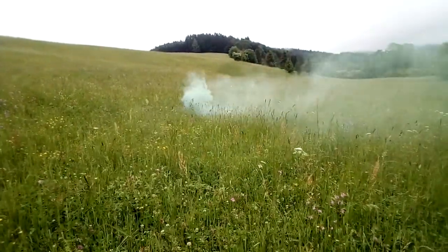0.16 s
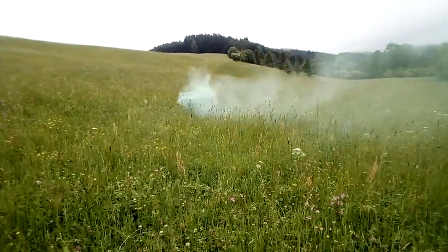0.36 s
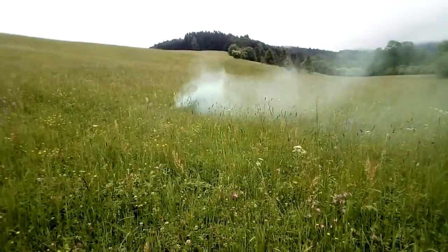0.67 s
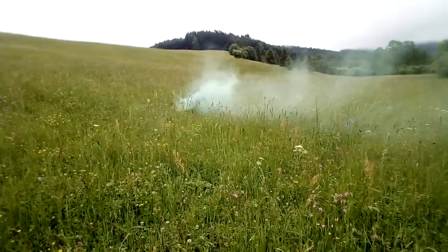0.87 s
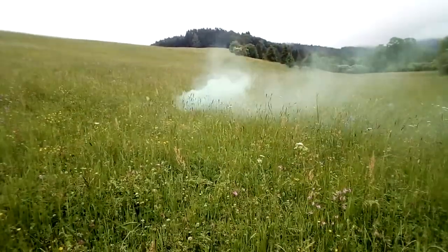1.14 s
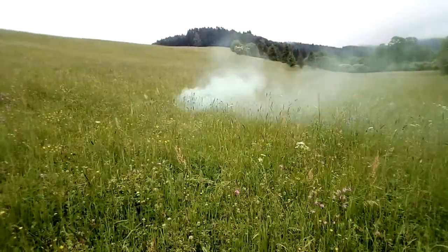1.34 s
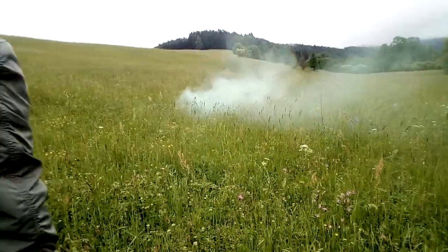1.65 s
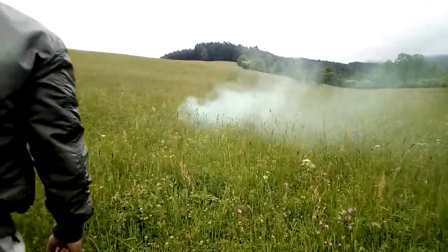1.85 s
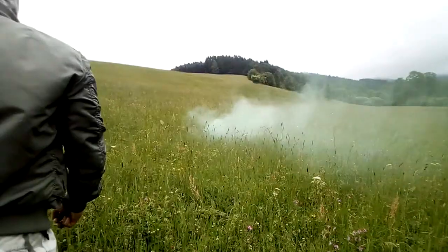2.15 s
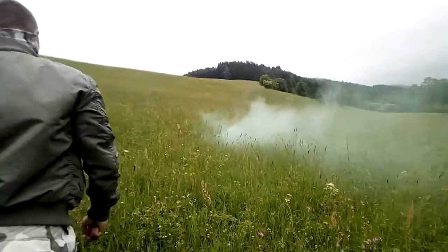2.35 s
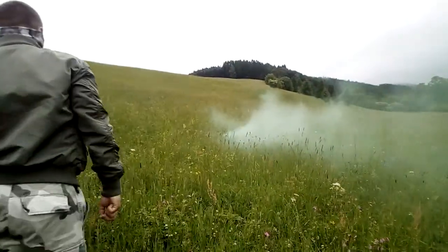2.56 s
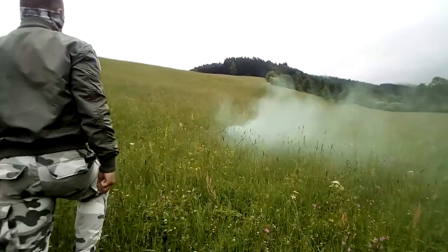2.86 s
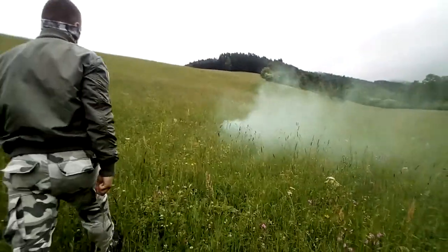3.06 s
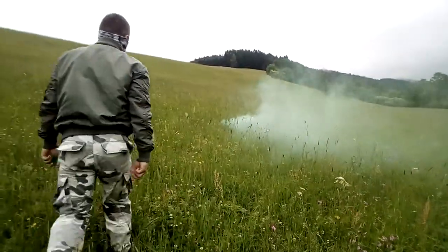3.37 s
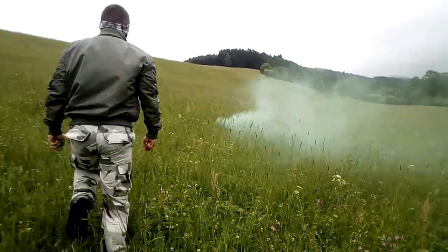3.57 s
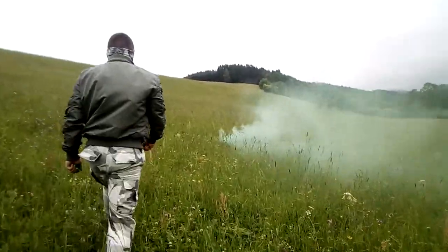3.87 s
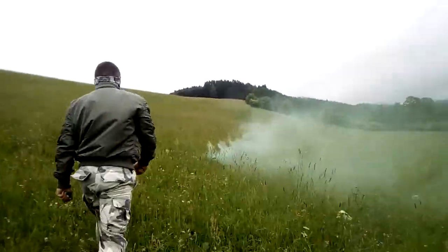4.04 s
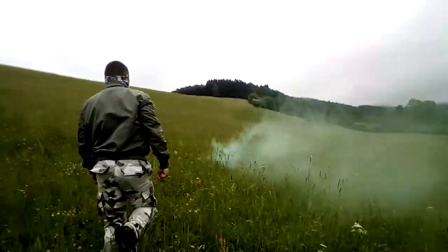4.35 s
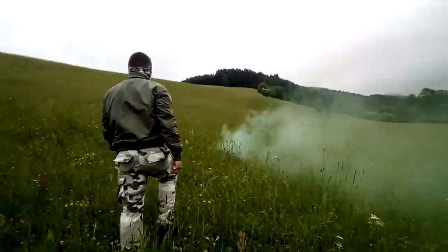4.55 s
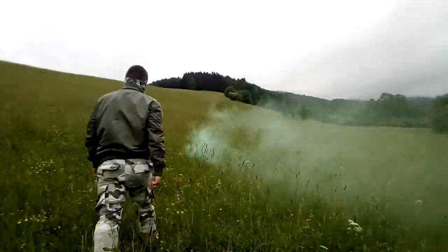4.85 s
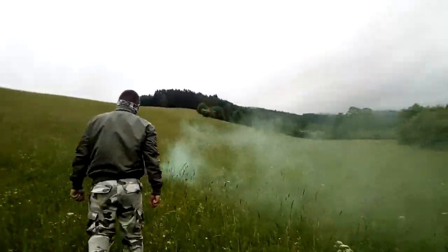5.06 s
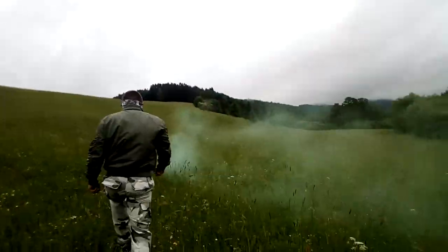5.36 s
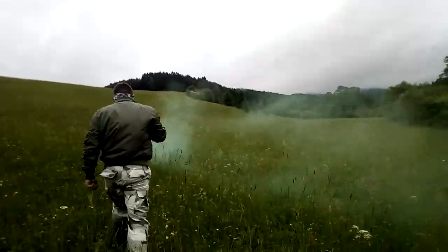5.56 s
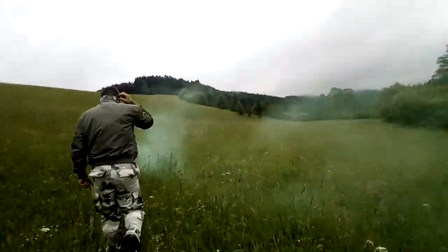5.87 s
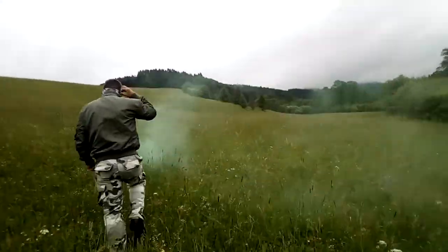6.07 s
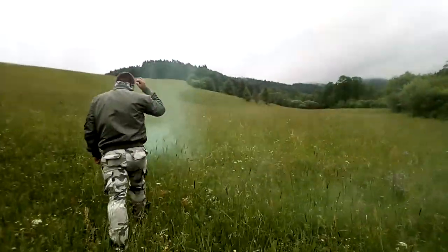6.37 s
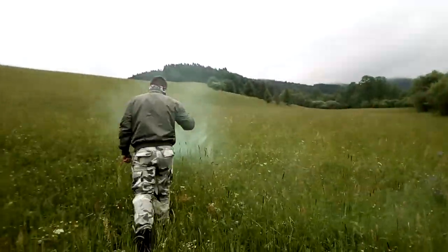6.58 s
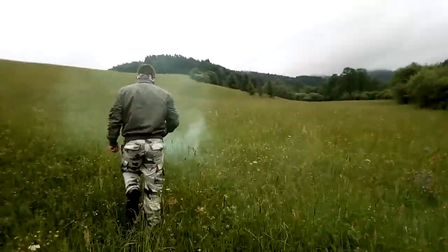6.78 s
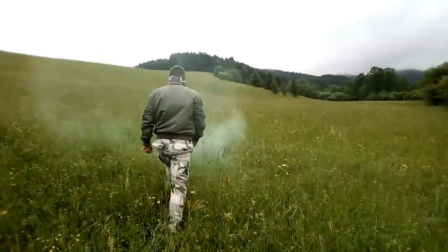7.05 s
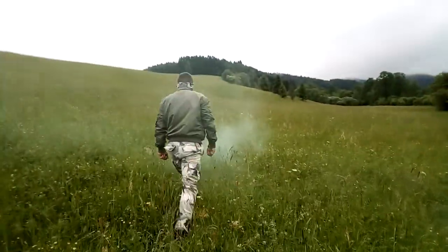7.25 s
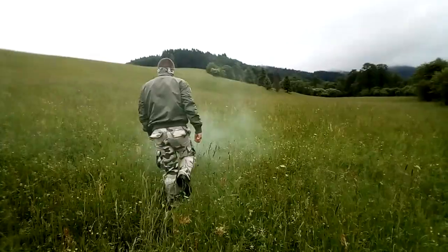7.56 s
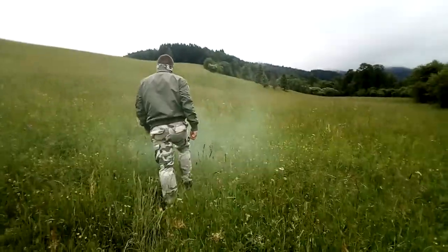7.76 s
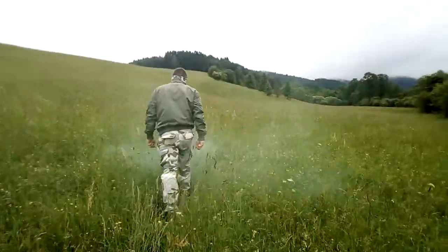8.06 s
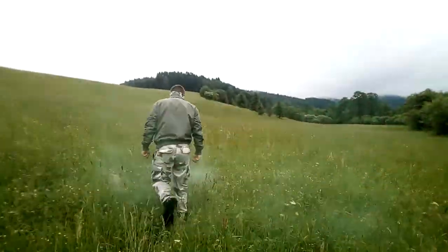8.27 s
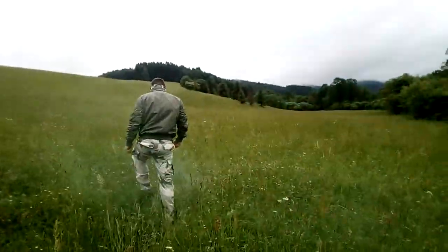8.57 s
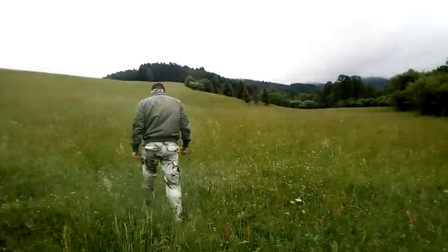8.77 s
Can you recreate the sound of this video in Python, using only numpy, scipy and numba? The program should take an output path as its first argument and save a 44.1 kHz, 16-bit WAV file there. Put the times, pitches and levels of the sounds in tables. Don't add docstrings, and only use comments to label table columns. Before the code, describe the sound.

An open summer meadow heard through a small, exposed microphone with light steady hiss. From 0 to 0.6 s blunt low wind thumps dominate, with faint lark notes far away. The wind drops; from about 0.8 s legs begin swishing through tall grass, bright and dry, with small stem cracks around 1 s. Gusts bump again at 2 to 2.7 s, then a lull leaves brushing strides at 3 to 3.5 s. From 4 to 5.6 s wind knocks return, with snaps near 4.1 s and a short rising squeak at 5.03 s. A rapid tiny creak runs at 5.7 to 5.8 s. Rustling grows denser at 6 to 7 s, with scrapes, squeaky rubs and the heaviest buffeting. After 7 s wind mostly eases while swishes continue, strong near 7.9 s; a final hard gust hits at 8.5 to 8.9 s. Distant falling whistles appear intermittently until about 7.7 s.

```python
import sys
import numpy as np
from scipy import signal
from scipy.fft import rfft, irfft
from scipy.io import wavfile
from scipy.ndimage import uniform_filter1d, map_coordinates
from numba import njit

SR = 44100
rng = np.random.default_rng(int(sys.argv[2]) if len(sys.argv) > 2 else 0)


def transcribe(u):
    v = np.clip(np.atleast_2d(u).T, -1, 1)
    q = np.round(v * 32767).astype(np.int16)
    wavfile.write(sys.argv[1], SR, q)


def boost_factor(decibels):
    exponent = np.asarray(decibels, float) / 20
    return 10 ** exponent


N = 393372
T = np.arange(N) / SR

# level/dB against the rustle, gain/dB per dB of brightness
GRASS_LAYERS = [
    (-1.5, -.5),
    (-1, 0),
    (-7, 0.3384),
    (-28, 0.9927),
]


def curves(table):
    s, *columns = np.transpose(table)
    return [np.interp(T, s, c) for c in columns]


def unit(x):
    return x / np.sqrt(np.mean(x ** 2))


@njit
def svf(x, hz, k):
    y, b, l = np.empty((3, len(x))), 0., 0.
    for i in range(len(x)):
        g = np.tan(np.pi * hz[i] / SR)
        v = (b + g * (x[i] - l)) / (1 + g * (g + k))
        y[0, i], y[1, i] = l + g * v, k * v
        y[2, i] = x[i] - y[1, i] - y[0, i]
        b, l = 2 * v - b, l + 2 * g * v
    return y


def steady(x, hz, k):
    return svf(x, np.full(len(x), float(hz)), k)


def noise():
    return rng.standard_normal(N)


def walk(rate):
    k = int(SR / rate)
    held = np.repeat(rng.standard_normal(N // k + 1), k)
    return unit(uniform_filter1d(uniform_filter1d(held, k), k)[:N])


def grains(rate, spread_db):
    hit = rng.random(N) < rate / SR
    size = boost_factor(spread_db * np.minimum(rng.exponential(size=N), 6))
    return unit(hit * rng.standard_normal(N) * size)


def colour(x, points, lo=0, hi=SR):
    hz, db = np.transpose(points)
    f = np.fft.rfftfreq(N, 1 / SR) + 1
    edges = 1 / np.sqrt((1 + (lo / f) ** 12) * (1 + (f / hi) ** 20))
    shape = boost_factor(np.interp(np.log(f), np.log(hz), db))
    return unit(irfft(rfft(x) * shape * edges, N))


def add(out, s, piece):
    i = max(int(s * SR), 0)
    out[i:i + len(piece)] += piece[:N - i]


def sweeps(offset_db, per_db):
    # t/s, rustle level/dB, brightness/dB
    brush = [(0, -77.5, -11.5), (.6, -72.5, -5), (.8, -65.5, 10.5), (2, -65, 7), (2.5, -65, -2.5),
             (2.9, -64.5, 7), (4.25, -64, -0.5), (4.4, -65, -4), (5.2, -64, 3.5), (6.4, -66, 7),
             (6.75, -66.5, -1), (7.6, -61.5, 4), (8.45, -63, 2.5), (8.92, -62, 1.5)]
    # middle t/s, length/s, rustle level/dB, brightness/dB (0 = far, heavy)
    strides = [(.88, 0.15, -64, 25), (1.19, 0.41, -64.5, 22), (1.53, 0.11, -67, 20), (1.88, 0.5, -60.5, 7),
               (2.17, 0.07, -75, 2), (2.62, 0.096, -82, 28), (3.08, 0.51, -62, 6.5), (3.34, 0.53, -59, 7),
               (3.75, 0.46, -67, 12), (4.11, 0.2, -63.5, -12), (4.19, 0.18, -62.5, 12),
               (4.701, 0.39, -59, 7.5), (4.93, 0.27, -58.5, 7), (5.07, 0.15, -61.5, 8),
               (5.381, 0.3, -60.5, -2), (5.58, 0.49, -65, 16.5), (5.77, 0.33, -59.5, -7),
               (5.68, 0.047, -68, 16), (5.99, 0.25, -62, 6), (6.12, 0.22, -57, -3), (6.25, 0.19, -57, 6.5),
               (6.56, 0.1, -57, 0), (6.65, 0.12, -57.5, 0.5), (6.95, 0.21, -58, 3.5), (7.15, 0.46, -60, 9),
               (7.34, 0.066, -64, 23), (7.46, 0.074, -61.5, -11), (7.55, 0.09, -61, 15),
               (7.94, 0.34, -56, 14), (7.92, .07, -63, 26), (8.13, 0.22, -64.5, 15.5),
               (8.62, 0.19, -70, 23.5), (8.82, 0.23, -61.5, 16)]
    brush_db, brush_bright_db = curves(brush)
    power = boost_factor(2 * (brush_db + per_db * brush_bright_db))
    for s, length, db, bright_db in strides:
        arch = np.abs(np.sin(np.pi * np.linspace(0, 1, int(length * SR))))
        swell = arch ** (2 * 0.83)
        add(power, s - length / 2, boost_factor(2 * (db + per_db * bright_db)) * swell)
    return boost_factor(offset_db) * np.sqrt(power)


def background():
    # f/Hz, density/dB per Hz
    hiss = [(200, 8.5), (500, 1), (1000, -13), (2500, 0), (4000, -10), (6400, -13), (7600, -26),
            (11000, -25), (14000, -27.5)]
    # f/Hz, density/dB per Hz
    shaped = [(13600, -17.5), (14200, -9), (14800, -1), (15500, 0), (15600, -30)]
    hiss_db, whine_db, whine_hz, shaped_db = -67.5, -103, 12897, -83
    out = boost_factor(hiss_db) * colour(noise(), hiss)
    out += boost_factor(whine_db) * np.sin(2 * np.pi * whine_hz * T)
    stirred = 1 + .25 * unit(sweeps(*GRASS_LAYERS[-1]))
    level = boost_factor(shaped_db - 1.5 + 1.2 * walk(8))
    return out + stirred * level * colour(noise() * boost_factor(1.2 * walk(200)), shaped)


def patches(x, depth_db, seconds, octaves):
    f, t, z = signal.stft(x, SR, nperseg=512)
    chance = rng.standard_normal((200, 2000))
    place = np.meshgrid(np.log2(f / 300 + 1) / octaves, t / seconds, indexing="ij")
    field = map_coordinates(chance, place, order=1)
    return signal.istft(z * boost_factor(depth_db * np.minimum(field, 1.5)), SR, nperseg=512)[1][:N]


def grass():
    # f/Hz, density/dB per Hz
    rustle = [(350, -8.5), (600, -4), (1000, -0.5), (1400, 0.5), (2070, -4.5), (3300, -9.5), (4300, -16),
              (6300, -11.5), (7300, -19), (8700, -25.5), (10000, -25.5), (11200, -33), (14000, -35)]
    edges_hz = (300, 2150, 4100, 7700, 14500)
    ticks = grains(rate=5000, spread_db=1.5) * boost_factor(1.2 * walk(40))
    clumps = patches(ticks + .95 * noise(), 1.5, .07, .35)
    clumps = patches(clumps, 4.6, .035, .04)
    layers = zip(edges_hz[:-1], edges_hz[1:], GRASS_LAYERS)
    return sum(sweeps(*rule) * colour(clumps, rustle, lo, hi) for lo, hi, rule in layers)


def gusts():
    # start t/s, length/s, level/dB, sharpness/dB (upper bass against deep bass)
    strong = [(0.009, 0.015, -29, -12.5), (0.076, 0.29, -29.5, -16), (0.377, 0.05, -35.5, -19.5),
              (0.461, 0.12, -31, -10), (1.939, 0.035, -35.5, -12), (2.031, 0.038, -26.5, -14),
              (2.109, 0.083, -28, -21.5), (2.245, 0.048, -33.5, -13.5), (2.353, 0.095, -34, -5),
              (2.485, 0.25, -35.5, -8.5), (2.759, 0.035, -36, -16), (3.656, 0.017, -30.5, -24.5),
              (3.968, 0.06, -35, -20), (4.067, 0.09, -30.5, -16), (4.289, 0.077, -29.5, -25),
              (4.46, 0.12, -28.5, -13.5), (4.42, .03, -35.5, -13.5), (4.715, 0.089, -30, -17),
              (5.118, 0.053, -28, -18.5), (5.227, 0.059, -31, -21), (5.469, 0.15, -29, -11.5),
              (5.62, 0.061, -34, -11.5), (6.07, 0.052, -27, -11), (6.275, 0.11, -24, -6.5),
              (6.42, 0.18, -27.5, -8.5), (6.625, .035, -33.5, -7), (6.676, 0.1, -25.5, -8.5),
              (7.019, 0.041, -34.5, -11.5), (7.097, 0.051, -37.5, -18.5), (7.447, 0.034, -36, -11.5),
              (8.289, 0.061, -35.5, -8.5), (8.487, 0.15, -25, -10), (8.73, 0.14, -30.5, -14),
              (8.868, 0.04, -38, -33)]
    # start t/s, length/s, level/dB
    weak = [(0.619, 0.045, -41), (0.767, 0.051, -39.5), (0.896, .04, -49.5), (1.078, .05, -38),
            (1.204, 0.082, -38.5), (1.394, 0.024, -51.5), (1.5, 0.085, -43), (1.64, .05, -50),
            (1.733, .08, -53.5), (1.852, .07, -38.5), (2.713, 0.17, -44), (3.021, 0.039, -39.5),
            (3.123, 0.049, -36), (3.206, .05, -58), (3.404, .05, -44.5), (4.167, .09, -42),
            (4.612, .1, -39.5), (4.845, .24, -37), (5.307, .11, -43), (5.696, 0.026, -42.5),
            (5.864, 0.035, -41.5), (5.942, .11, -38.5), (0.581, 0.034, -36), (6.172, .04, -48),
            (6.871, .06, -49), (6.946, .05, -48.5), (7.168, .15, -35.5), (7.338, .04, -47.5),
            (7.491, .04, -47), (7.718, 0.036, -43), (7.841, 0.069, -36.5), (7.943, 0.2, -47),
            (8.355, .08, -42)]
    lull_db, puff_sharp_db = -76, -23
    rise_db_per_s, fall_db_per_s = 498.5, 259.5
    power = boost_factor(2 * lull_db) + 0 * T
    sharp = power * puff_sharp_db
    for s, length, db, sharp_db in list(strong) + [(*puff, puff_sharp_db) for puff in weak]:
        rise = rise_db_per_s * np.maximum(s - T, 0)
        fall = fall_db_per_s * np.maximum(T - s - length, 0)
        blow = boost_factor(2 * (db - rise - fall))
        power, sharp = power + blow, sharp + blow * sharp_db
    return 10 * np.log10(power) - 5, sharp / power - 0.5


def turbulence():
    gust_db, sharp_db = gusts()
    eddy_hz = np.clip(170 * 2 ** ((sharp_db + 20.0) / 13 + 0.31 * walk(45)), 70, 520)
    kicks, hush = grains(rate=170, spread_db=2), noise()
    air = svf(kicks + 0.58 * hush, eddy_hz, 1.8)[0]
    air = svf(svf(air, eddy_hz, 1.48)[0], eddy_hz, 1.28)[0]
    fine = steady(svf(hush + .3 * kicks, eddy_hz, 1.76)[0], 900, 1.22)[0]
    air = air + boost_factor(-19) * fine
    return unit(air * (170 / eddy_hz) ** 0.78) * boost_factor(gust_db + 2 + 2.1 * walk(35))


def eddy(hz):
    u = np.arange(-SR / hz, SR / hz) * hz / SR * 4.7
    return (1 - u ** 2) * np.exp(-u ** 2 / 2)


def lone_eddies(air, cores):
    # t/s, core peak level/dB, body level/dB
    strongest = [(0.021, -39, -27), (6.384, -24, -27.5), (0.288, -32.5, -23), (0.536, -22.5, -23),
                 (1.951, -38.5, -31.5), (2.037, -35.5, -23), (2.402, -30.5, -31.5), (2.534, -23, -28.5),
                 (2.597, -33.5, -32.5), (4.271, -39.5, -29), (4.458, -30, -19), (4.531, -18.5, -19.5),
                 (4.559, -29, -31.5), (4.807, -28, -21), (5.13, -35.5, -30.5), (5.262, -32, -26),
                 (5.576, -24, -19), (6.099, -28.5, -26), (6.26, -42, -18), (6.313, -24.5, -20.5),
                 (6.333, -22, -22), (6.479, -26.5, -26), (6.685, -27.5, -23.5), (6.769, -21.5, -27.5),
                 (6.812, -27.5, -22.5), (7.021, -35, -32.5), (8.291, -42.5, -29.5), (8.5, -29, -20.5),
                 (8.54, -22.5, -23), (8.725, -30, -24)]
    # t/s, body level/dB
    thuds = [(.076, -33), (0.477, -32), (0.795, -47), (1.255, -49), (2.355, -33.5), (3.035, -44.5),
             (3.124, -41), (3.425, -42.5), (3.644, -41.5), (4.092, -32), (4.327, -32), (5.484, -31.5),
             (5.517, -29), (5.536, -26.5), (6.274, -25.5), (6.428, -36), (6.526, -26.5), (6.644, -29),
             (7.258, -33.5), (7.444, -31.5), (7.668, -50), (7.861, -57), (8.089, -46), (8.486, -24.5),
             (8.567, -28), (8.626, -28.5), (.13, -29), (.235, -34), (6.713, -25.5), (6.738, -26),
             (5.61, -37), (.56, -33), (8.3, -36.5), (0.311, -32.5), (5.493, -30), (6.495, -25.5),
             (6.359, -27), (6.59, -32), (6.786, -29), (2.43, -35), (3.142, -41.5), (2.775, -36.5),
             (7.74, -48), (7.884, -45.5), (7.955, -47), (8.513, -24.5), (8.591, -28), (5.875, -47),
             (5.961, -43), (7.51, -44), (5.385, -42.5), (8.835, -37)]
    # t/s, core peak level/dB, body level/dB
    whirls = [(1.494, -54, -42.5), (1.519, -45.5, -39.5), (1.543, -44, -37), (1.217, -56, -43.5),
              (1.418, -66, -54), (6.374, -27, -25), (6.556, -35, -31), (6.344, -29, -29),
              (2.408, -33.5, -30.5), (2.61, -42, -31.5), (4.282, -42, -31), (4.338, -45, -33.5),
              (8.569, -32, -34)]
    rounder = [(s, db - 10 + .8 * (db + 31.5), db) for s, db in thuds]
    eddies = list(strongest) + rounder + list(whirls)
    chance = rng.standard_normal((len(eddies), 4))
    for (s, core_db, body_db), (side, size, early, late) in zip(eddies, chance):
        core_hz = 300 * 2 ** ((core_db - body_db + 2.5) / 30)
        body_hz = 135 * 2 ** (0.37 * np.tanh(size) + min(body_db + 34, 0) / 25)
        dip = -1 if side < 1.9 else 1
        ragged = np.sign(side)
        parts = ((cores, dip, 0, core_hz, core_db + 4.5),
                 (cores, dip, .0015, body_hz, body_db + 6.8),
                 (air, ragged, -.006 * abs(early), 0.81 * core_hz, core_db - 5.0),
                 (air, ragged, 0.00501 + 0.00892 * abs(late), 0.67 * core_hz, core_db - 2.5))
        for out, sign, lag, hz, db in parts:
            add(out, s + 0.00301 + lag - 1 / hz, sign * boost_factor(db) * eddy(hz))


def wind():
    air, cores = turbulence(), np.zeros(N)
    lone_eddies(air, cores)
    rumble = colour(noise(), [(20, 1.0), (60, -4.5), (150, -27.0), (300, -54.0)])
    air += boost_factor(-59.5 + 1.4 * walk(2.8)) * rumble
    air = steady(air, 95, 0.8)[2]
    return steady(air, 30, 0.35)[2] + cores


def lark():
    # t/s, length/s, f/Hz, level/dB
    held = [(0.08, 0.033, 3030, -70.5), (0.38, 0.034, 2780, -66), (0.452, 0.031, 1900, -66),
            (0.217, 0.035, 2440, -65.5), (0.477, 0.08, 2450, -63), (0.668, 0.032, 2990, -64),
            (0.95, 0.033, 2050, -61), (2.1, 0.076, 3610, -60), (2.242, 0.03, 3720, -59.5),
            (2.282, 0.043, 4080, -63), (2.403, 0.063, 3570, -59), (2.863, 0.017, 3860, -55),
            (4.217, 0.019, 3780, -55), (6.296, 0.02, 2050, -56), (6.639, .03, 3470, -58),
            (3.571, 0.056, 3230, -61)]
    # t/s, length/s, start f/Hz, end f/Hz, level/dB
    sliding = [(4.308, 0.053, 3580, 3400, -60), (4.886, 0.062, 3480, 3300, -49.5),
               (4.942, 0.042, 3300, 3080, -59), (5.454, 0.035, 2780, 2960, -58),
               (5.513, 0.025, 2730, 2860, -55), (6.029, 0.033, 2690, 3140, -59),
               (6.068, .12, 4150, 3290, -52), (6.462, 0.069, 2780, 2750, -58),
               (7.154, 0.0483, 3360, 3080, -51.5), (7.181, 0.056, 3150, 2620, -60),
               (6.308, .018, 5030, 4800, -57), (6.318, 0.033, 4500, 4150, -63),
               (7.718, 0.024, 3700, 2600, -57)]
    sag_hz_per_s = 1000
    sagging = [(s, length, hz, hz - sag_hz_per_s * length, db) for s, length, hz, db in held]
    out = np.zeros(N)
    for s, length, hz, end_hz, db in list(sliding) + sagging:
        u = np.linspace(0, 1, int(length * SR))
        pitch = end_hz + (hz - end_hz) * (1 - u) ** 2.6
        flutter = 1 + 0.014 * np.sin(2 * np.pi * 70 * length * u)
        whistle = np.sin(2 * np.pi * np.cumsum(pitch * flutter) / SR)
        add(out, s, boost_factor(db) * np.sin(np.pi * u ** .8) ** 0.5 * whistle)
    t = T[:SR // 8]
    smear = signal.fftconvolve(out, rng.standard_normal(len(t)) * np.exp(-t / 0.024))[:N]
    return out * boost_factor(-.6 + 2.3 * walk(90)) + boost_factor(-41) * smear


def snaps():
    # t/s, peak level/dB, ring f/Hz, treble level/dB
    breaks = [(1.011, -41.5, 1780, -29), (3.01, -38, 2940, -40), (3.2186, -37, 2060, -32),
              (3.985, -36, 1570, -25), (4.292, -33, 1100, -34), (4.6767, -39, 2470, -12),
              (5.9876, -30.5, 2880, -12.5), (6.197, -44, 2540, -13), (6.606, -40, 1130, -28),
              (6.788, -35, 1990, -32), (7.347, -37, 5200, -17), (7.647, -43, 1687, -29),
              (8.4757, -34, 3100, -45), (4.053, -39, 1420, -40), (4.106, -44, 1900, -35),
              (4.129, -40, 1500, -40), (4.139, -39, 1200, -40), (4.153, -45, 1700, -30),
              (6.148, -36, 1600, -40), (6.632, -45, 4300, -40), (.845, -52, 6000, -12),
              (1.0795, -46, 6000, -10), (1.487, -56, 8300, -8), (1.909, -52, 7000, -10),
              (1.952, -52, 7500, -10), (5.509, -54, 7500, -10), (7.86, -49, 7500, -9),
              (8.795, -52, 7000, -10), (2.323, -56, 7200, -12), (2.379, -53, 7200, -12),
              (4.948, -46, 6250, -18), (7.043, -38, 5960, -24), (7.922, -42, 5000, -6),
              (.7793, -49, 7500, -10), (1.7057, -48, 4000, -14), (6.612, -38, 2280, -40),
              (6.621, -39, 3000, -40)]
    out, t = np.zeros(N), T[:SR // 50]
    for s, db, hz, treble_db in breaks:
        splinter = rng.standard_normal(len(t)) * np.exp(-t / 0.001)
        crack = 3.5 * np.exp(-t / 4e-5) + .45 * splinter
        ring = np.sin(2 * np.pi * hz * t) * np.exp(-t / 0.0012)
        knock = steady(steady(crack, 2500, 0.57)[1], 4500, 3.5)[0]
        treble = steady(steady(crack, 7000, 1.1)[2], 10000, 1.2)[0]
        add(out, s, boost_factor(db) * (0.42 * ring + 1.5 * knock + boost_factor(treble_db + 1.0) * treble))
    return out


def drags():
    # t/s, length/s, centre f/Hz, width/Hz, level/dB
    scrapes = [(.98, .25, 3450, 1200, -61), (4.175, 0.073, 5960, 990, -60.5), (3.27, .25, 4200, 830, -66.5),
               (6.188, .028, 9000, 2200, -66), (5.68, 0.17, 2140, 500, -59.5), (6.085, 0.1, 1770, 900, -54),
               (6.606, 0.015, 3600, 520, -55), (6.657, 0.0077, 3350, 400, -55),
               (4.8, .014, 6000, 770, -60.5), (6.6, 0.038, 2400, 880, -54.5), (5.3, .12, 2440, 370, -60),
               (5.43, 0.11, 2550, 670, -58.5), (4.105, 0.033, 5900, 930, -59), (6.195, .01, 6900, 650, -57),
               (.87, 0.15, 3300, 900, -62), (1.8, 0.16, 4100, 2300, -65.5), (7.7, 0.061, 1320, 270, -68),
               (8.6, 0.099, 2170, 350, -65), (4.5, 0.15, 880, 940, -58.5), (3.7, 0.25, 6200, 1400, -70),
               (8.245, 0.075, 1670, 630, -57.5), (5.76, 0.16, 6140, 1000, -63.5),
               (6.21, 0.095, 9200, 1500, -72.5), (5.65, 0.057, 8300, 1500, -73),
               (4.69, .1, 8900, 1500, -73), (8.09, 0.073, 9200, 1500, -74), (1.55, .08, 600, 300, -63),
               (1.27, .08, 520, 250, -66), (3.2, .24, 2600, 1500, -65)]
    out, catches = np.zeros(N), boost_factor(3.5 * walk(150))
    for s, length, hz, width_hz, db in scrapes:
        n = int(length * SR)
        scrape = rng.standard_normal(SR // 4)[:n] * catches[int(s * SR):][:n]
        scrape = steady(scrape, hz, 2.4 * width_hz / hz)[1]
        scrape = unit(steady(scrape, hz, width_hz / hz)[1])
        add(out, s, boost_factor(db) * np.hanning(n) ** 0.18 * scrape)
    return out


def squeaks():
    # t/s, length/s, start f/Hz, end f/Hz, level/dB
    squeals = [
        (5.034, 0.0243, 1710, 2210, -27.5),
        (6.6, 0.0148, 1090, 1350, -34.5),
    ]
    out = np.zeros(N)
    for s, length, hz, end_hz, db in squeals:
        u = np.linspace(0, 1, int(length * SR))
        pitch = (hz + (end_hz - hz) * u) * (1 + 0.094 * np.sin(14 * u))
        phase = 2 * np.pi * np.cumsum(pitch) / SR
        slip = 1 - 0.9 * np.exp(-((u - .62) / 0.016) ** 2)
        grip = (0.081 + 0.65 * u ** 1.5) * np.clip((1 - u) / 0.17, 0, 1) * slip
        add(out, s, boost_factor(db) * grip * (np.sin(phase) + 0.21 * u ** 2 * np.sin(3 * phase)))
    return out


def creak():
    # t/s, peak level/dB, f/Hz
    ticks = [(5.6793, -38, 1920), (5.6985, -43, 1950), (5.7145, -43, 2200), (5.725, -42, 1900),
             (5.732, -45, 2300), (5.7455, -40, 1900), (5.7548, -37.5, 2050), (5.7612, -39, 2100),
             (5.7668, -43, 2400), (5.7722, -42, 2000), (5.7785, -43, 2300), (5.787, -45, 2150),
             (5.795, -46, 2600), (5.8055, -44, 2100), (5.8148, -42, 2350), (5.8208, -41, 1950),
             (5.834, -47, 2200)]
    ring_s = 0.0011
    out, t = np.zeros(N), T[:SR // 80]
    swell = t / ring_s * np.exp(-t / ring_s * 2.0) * 4
    for s, db, hz in ticks:
        add(out, s, boost_factor(db + 3) * np.sin(2 * np.pi * hz * t) * swell)
    return out


def rubs():
    # t/s, length/s, start f/Hz, end f/Hz, level/dB
    whistles = [(6.084, .025, 1380, 1480, -47), (6.104, 0.0276, 1550, 2300, -54),
                (6.126, .05, 2200, 1350, -49), (6.527, .026, 3150, 2500, -52.5),
                (6.564, .02, 1500, 1800, -55), (6.62, .01, 1030, 1450, -49),
                (6.625, 0.0102, 3500, 5200, -57), (6.605, .02, 3950, 3800, -55),
                (5.78, .03, 9700, 9600, -77), (6.193, .014, 11100, 11100, -70),
                (7.335, .012, 10500, 10300, -65)]
    out = np.zeros(N)
    for s, length, hz, end_hz, db in whistles:
        n = int(length * SR)
        pitch = np.geomspace(hz, end_hz, n)
        tone = np.sin(2 * np.pi * np.cumsum(pitch) / SR)
        rough = unit(svf(rng.standard_normal(SR // 8)[:n], pitch, .09)[1])
        add(out, s, boost_factor(db) * np.hanning(n) ** 0.38 * (tone + .9 * rough))
    return out


def scene():
    stems = snaps() + drags() + squeaks() + creak() + rubs()
    return (background() + grass() + wind() + lark() + stems)[None]


def roll_off(x):
    return signal.sosfilt(signal.butter(12, 16840, fs=SR, output="sos"), x)


def record(dry):
    rounded = .42 * np.tanh(dry / .42)
    top_cut = signal.ellip(10, .2, 70, 15530, fs=SR, output="sos")
    mix = signal.sosfilt(top_cut, rounded)
    return roll_off(mix)


dry = scene()
out = record(dry)
transcribe(out)
```